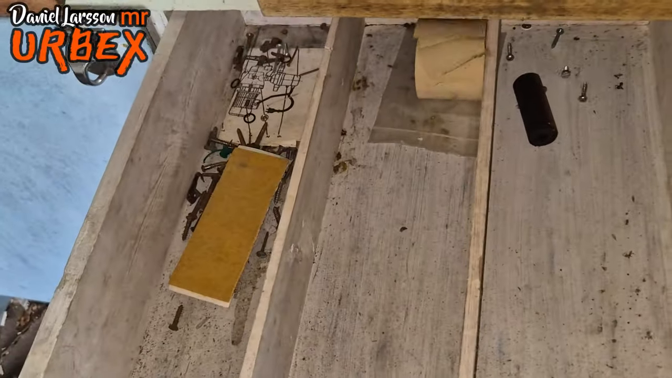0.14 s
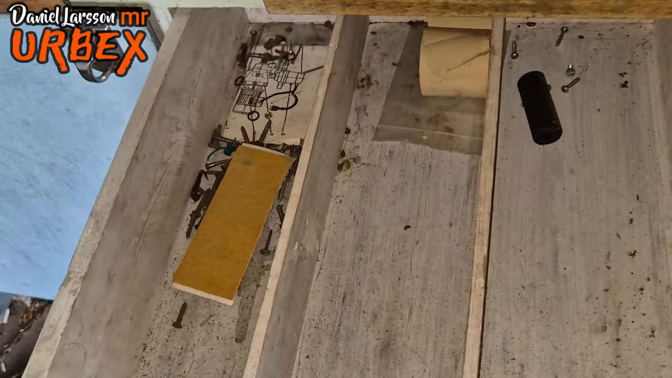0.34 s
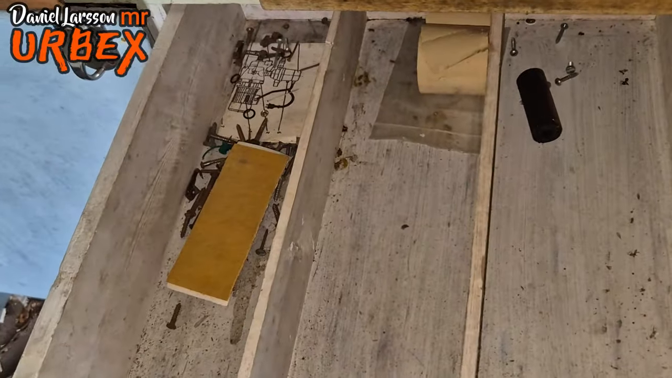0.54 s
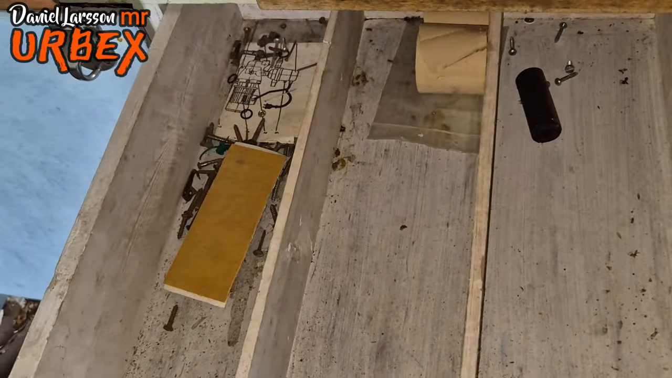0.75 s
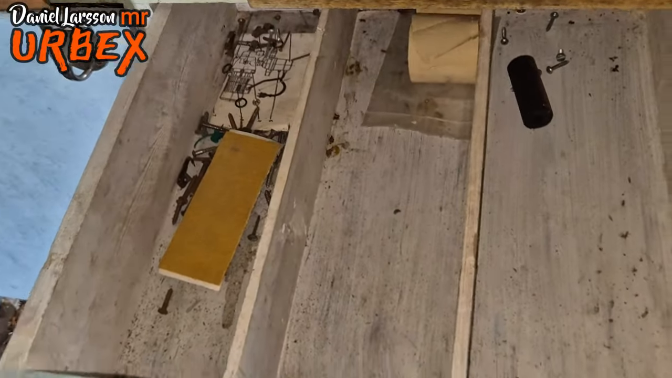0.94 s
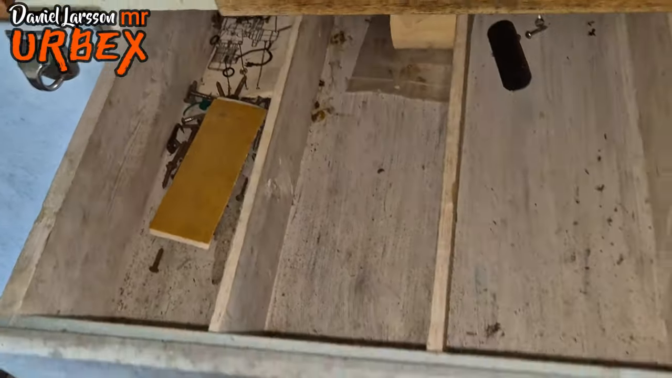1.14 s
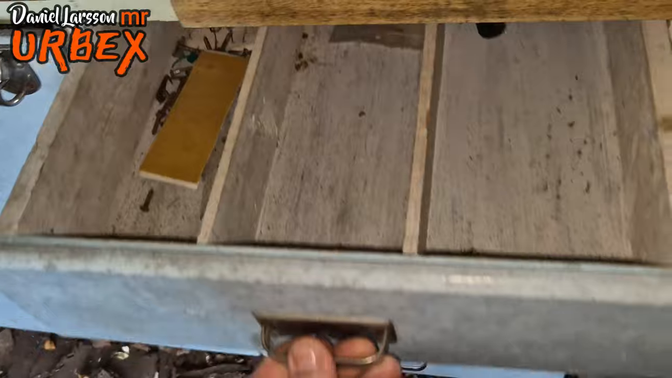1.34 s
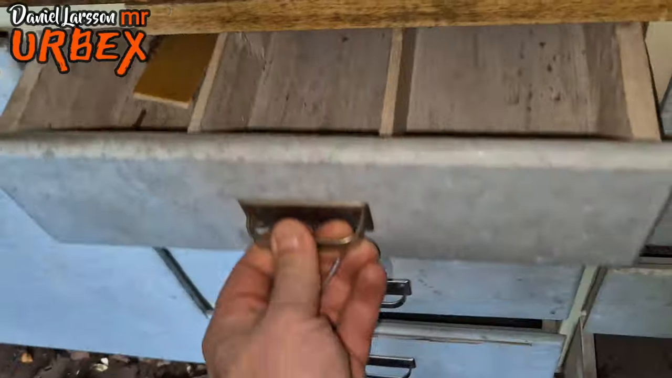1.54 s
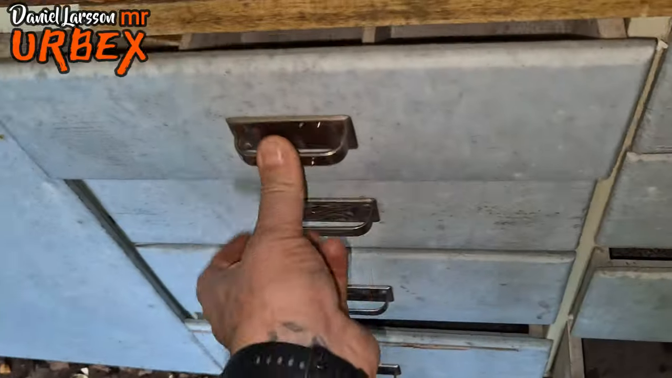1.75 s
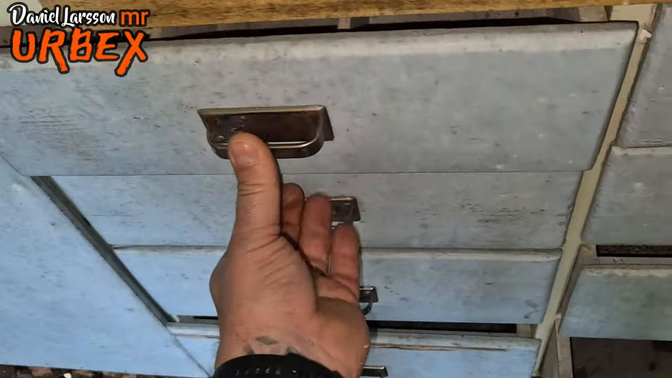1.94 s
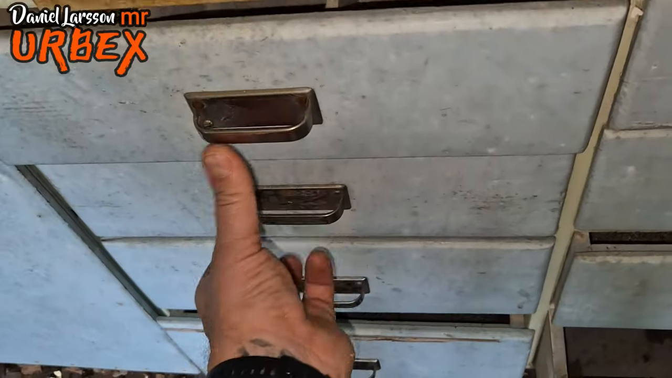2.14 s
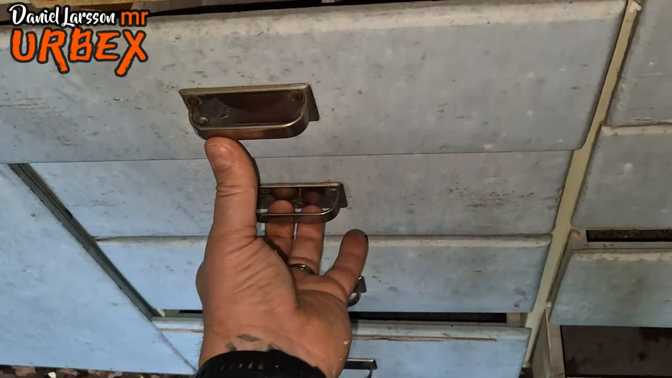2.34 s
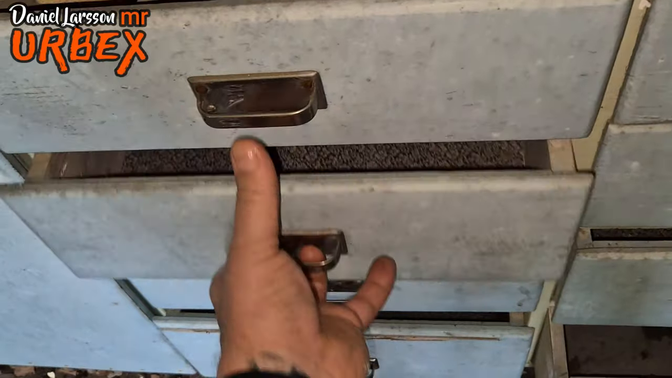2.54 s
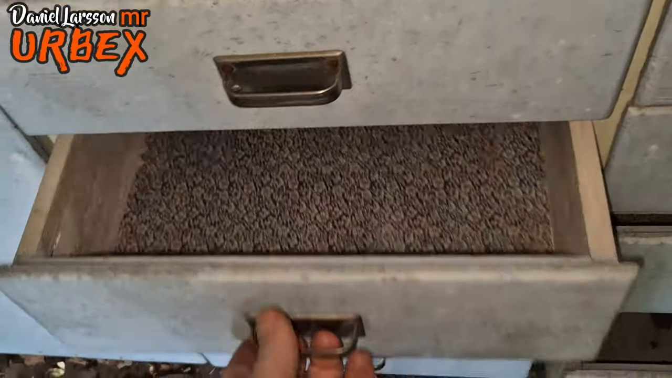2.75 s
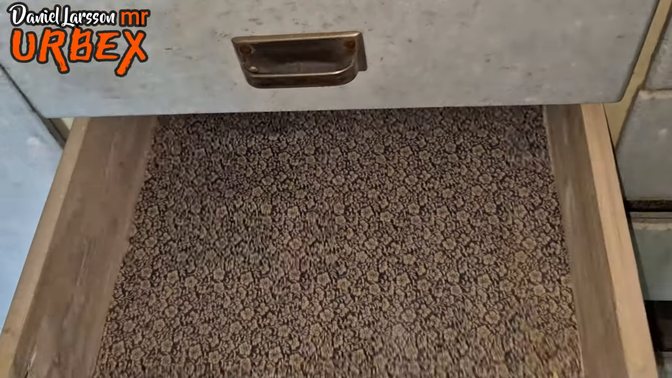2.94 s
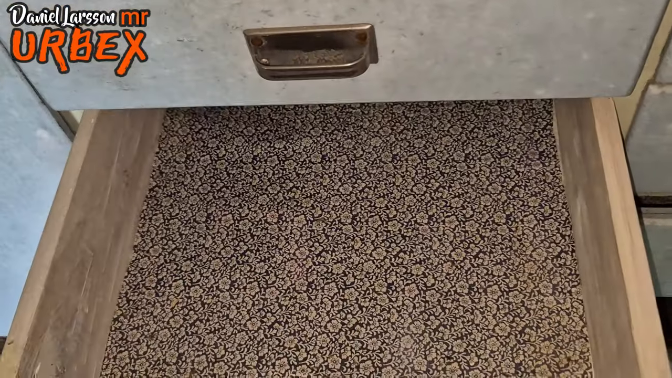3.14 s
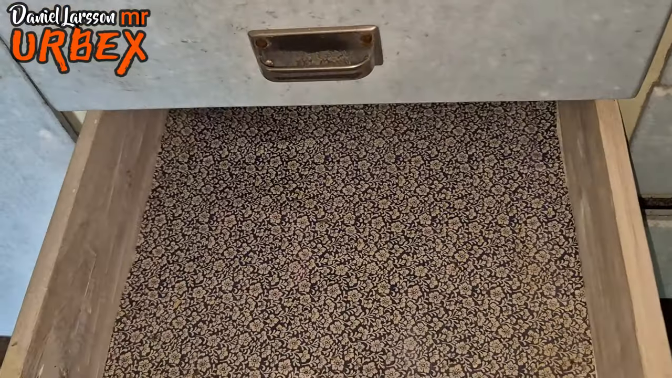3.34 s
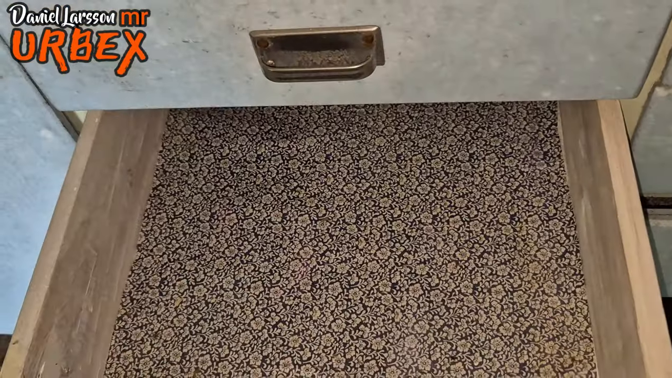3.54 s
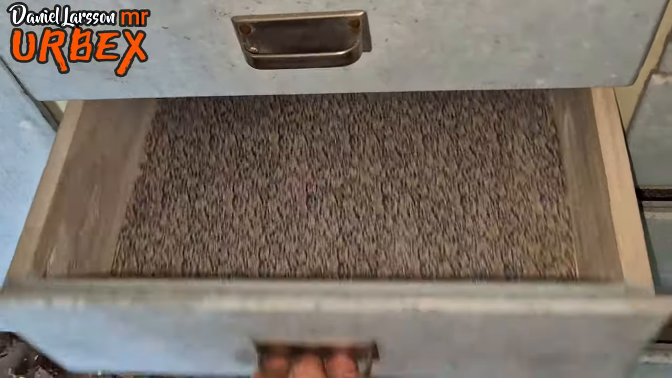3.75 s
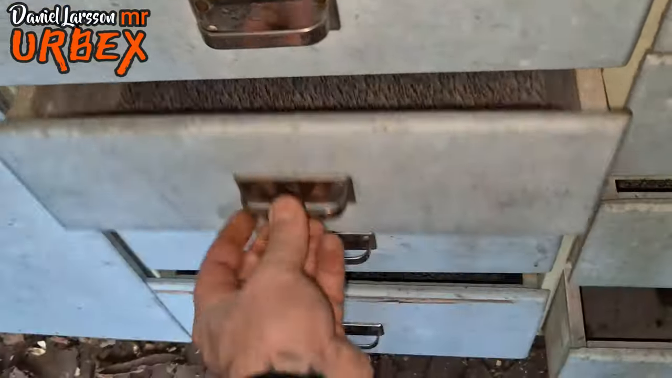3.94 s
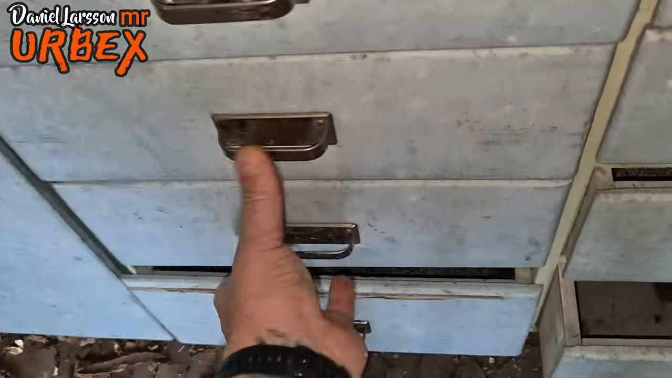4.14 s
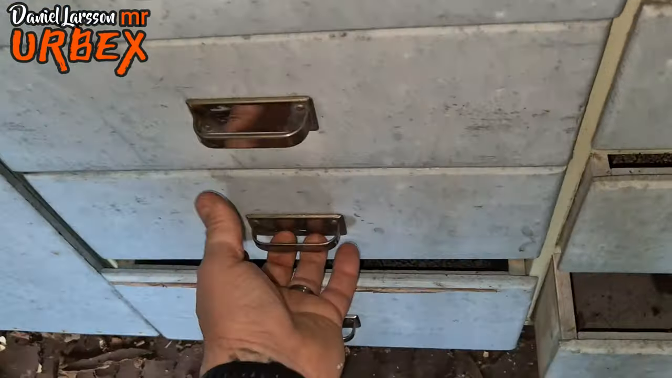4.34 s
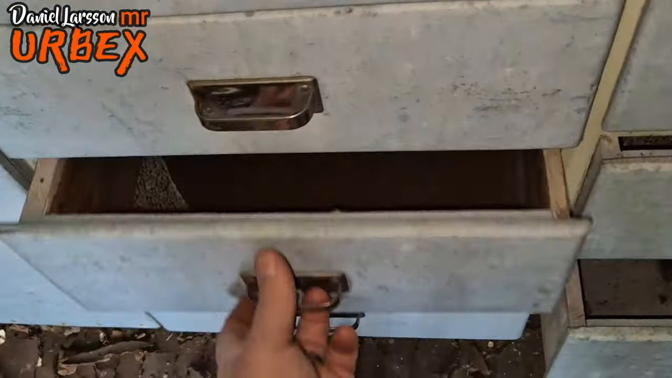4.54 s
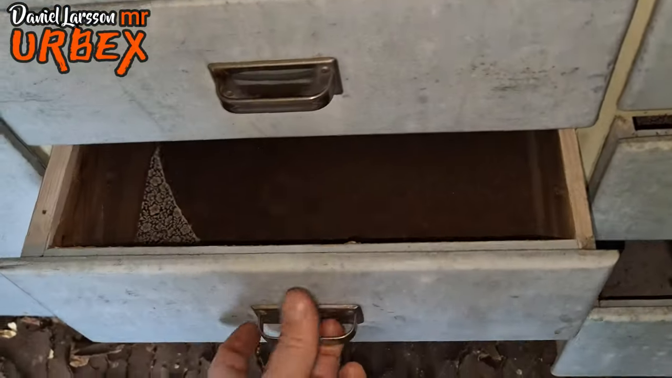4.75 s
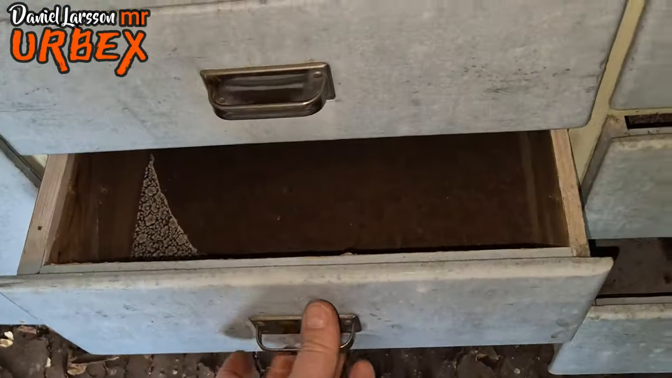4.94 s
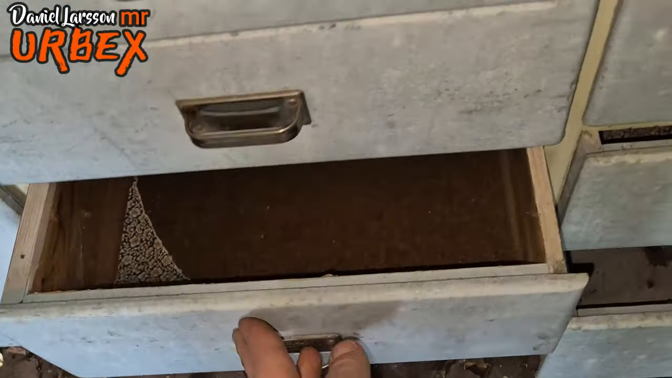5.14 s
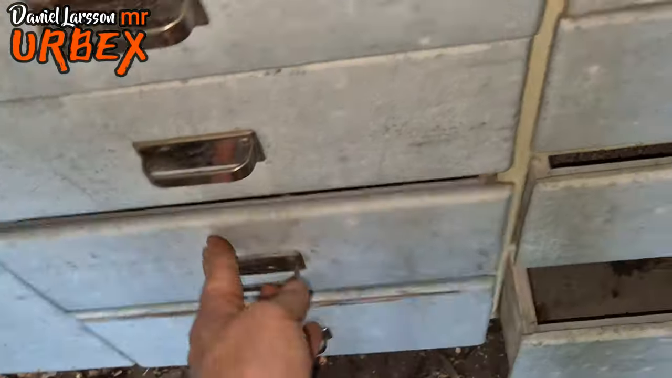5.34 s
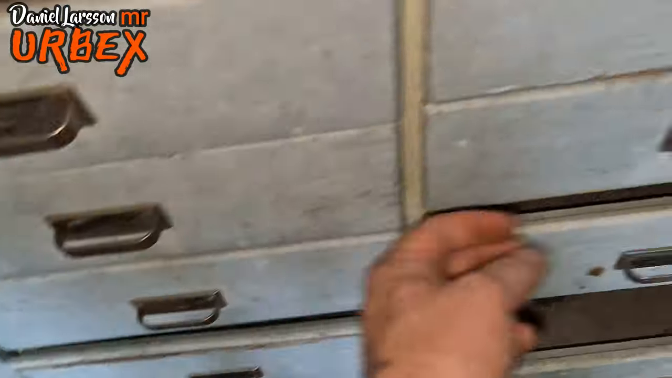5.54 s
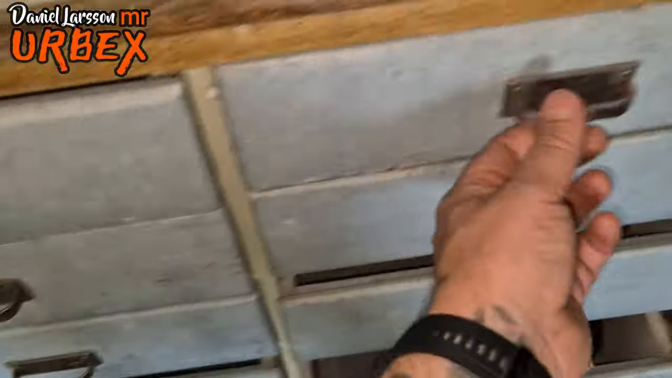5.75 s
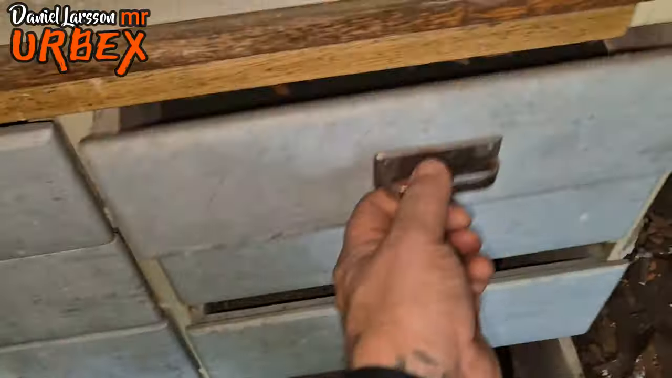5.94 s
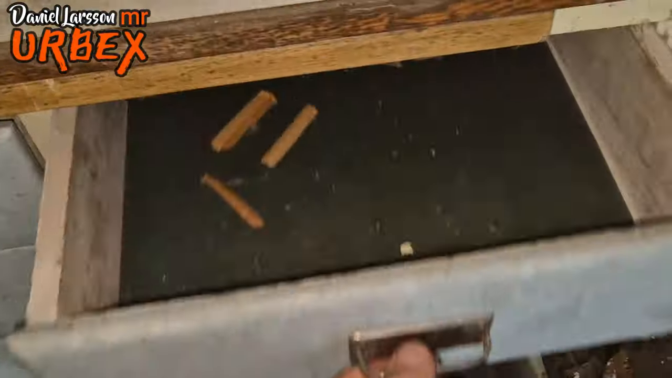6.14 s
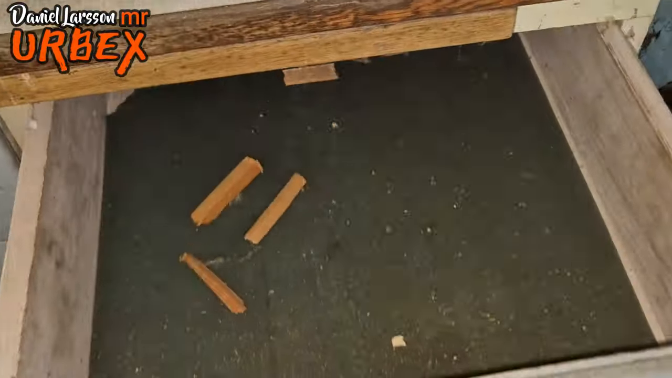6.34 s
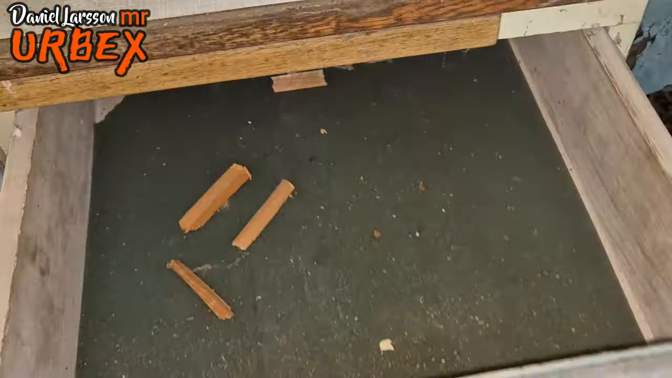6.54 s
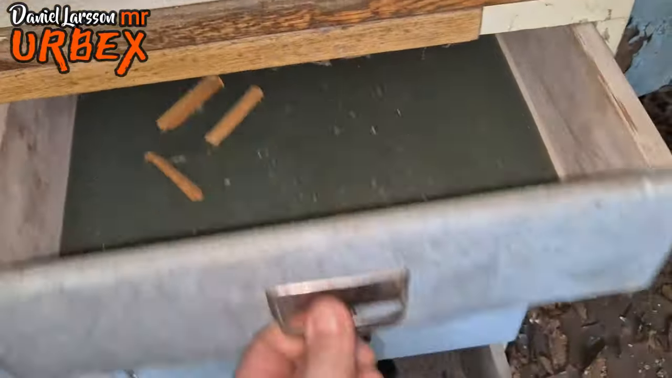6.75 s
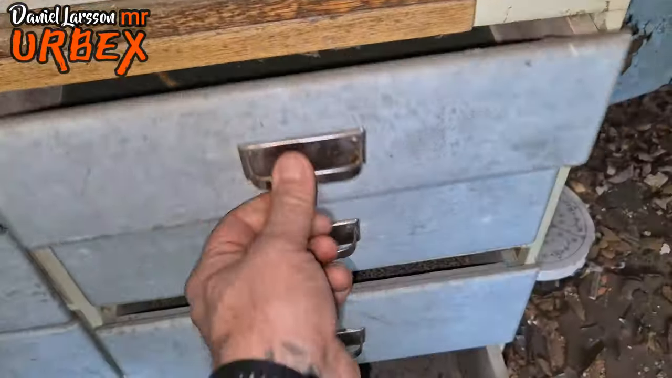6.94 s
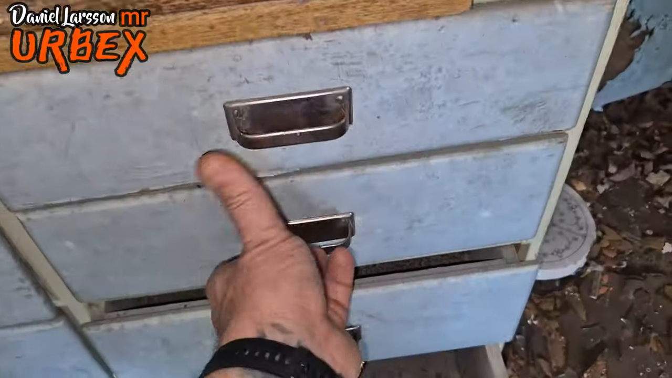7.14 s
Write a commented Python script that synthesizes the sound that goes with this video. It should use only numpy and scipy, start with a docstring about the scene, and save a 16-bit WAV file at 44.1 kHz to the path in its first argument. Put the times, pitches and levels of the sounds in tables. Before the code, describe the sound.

Old wooden drawers scrape and rumble open and shut in gritty runners, with hollow knocks, short groans and clicking metal pulls in a bare room.

```python
"""In the kitchen of an empty house, old wooden cabinet drawers are pushed shut and pulled open, close by.
Wood slips on wood in many small jolts that ring the cabinet; grit hisses as dust in the runners.
Drawers groan as wavering tones and knock at their stops, ringing the cabinet modes.
Fingers click the metal pulls, a crack of noise with a metal ring; fine ticks are short bands of noise.
Bare walls return a short echo, over the hiss of the still room and the microphone."""
import sys
import numpy as np
from scipy import signal
from scipy.fft import rfft, irfft
from scipy.io import wavfile
from scipy.ndimage import uniform_filter1d, minimum_filter1d

SR = 44100
rng = np.random.default_rng(int(sys.argv[2]) if len(sys.argv) > 2 else 0)


def file_out(sig):
    """Save sig as 16-bit WAV at sys.argv[1]."""
    # one column per channel
    cols = np.atleast_2d(sig).T
    # limit, then scale
    lim = np.clip(cols, -1, 1)
    pcm = np.round(lim * 32767).astype(np.int16)
    wavfile.write(sys.argv[1], SR, pcm)


N = 321048

# Colour of the still room and microphone hiss. Each row: frequency in Hz, relative level in dB per Hz.
AIR_COLOUR = [(30, -40), (130, -34), (400, -2.5), (1300, -16.5), (6500, -29), (9500, -13.5), (11500, -28),
              (16000, -35.5)]
# Level of that hiss, which sinks a little early on. Each row: time in seconds, level in dB.
AIR_LEVEL = [(1, -53.5), (3.2, -58)]
# Colour of the dust hiss. Each row: frequency in Hz, relative level in dB per Hz.
DUST_COLOUR = [(1500, -14.5), (2700, -6.5), (5900, -6), (8500, -1), (11300, -13.5), (13300, -13.5),
               (16000, -21.5)]
# Runs of fast sliding. Each row: start in seconds, length in seconds, share of the length at which
# speed peaks, dust hiss in dB and scrape of the sides in dB, both at top speed.
RUNS = [(-.04, 0.43, 0.074, -45, -36), (0.837, 0.31, 0.46, -37.5, -39), (1.048, 1, 0.062, -34, -35),
        (1.41, 1, 0.07, -38, -35), (1.793, 0.28, 0.16, -47.5, -27.5), (2.302, 0.96, 0.42, -45, -38),
        (2.564, 0.55, 0.56, -30.5, -30), (3.506, 0.4, 0.57, -33, -34.5), (3.798, 0.4, 0.2, -36.5, -29.5),
        (4.378, 0.87, 0.14, -47.5, -40), (4.572, 0.14, 0.63, -37.5, -39), (4.749, 0.18, 0.069, -40, -43),
        (5.162, 0.42, 0.25, -42.5, -40), (5.451, 0.12, 0.52, -49.5, -40.5), (5.66, 0.15, 0.1, -48.5, -35),
        (5.688, 0.87, 0.47, -45.5, -37), (5.99, 0.53, 0.41, -37.5, -61), (6.505, 0.75, 0.37, -40, -37)]
# Shoves of the hand. Each row: start in seconds, length in seconds, jolts at the start in dB, jolts at
# the end in dB, weight on the frame at the start in dB re jolts, small panels over large in dB per octave,
# dying away of the panels in dB per second.
SHOVES = [(-.02, 0.11, -26, -29.5, -13, 1, 57), (0.773, 0.33, -45.5, -17.5, -5.5, -2.5, 300),
          (1.086, 0.25, -27, -21, -11.5, -0.5, 300), (1.404, 0.23, -25.5, -27, -1, -4.5, 300),
          (1.652, 0.22, -21, -29.5, -2.5, -4, 89), (2.238, 0.24, -36, -43.5, 7, -12.5, 112),
          (2.493, 0.49, -23.5, -24, 1.5, -2.3, 185), (3.546, 0.33, -24.5, -19.5, 0.5, -0.4, 84),
          (4.398, 0.063, -26.5, -25, 7.5, -7, 248), (4.512, 0.09, -18, -27, -1, -1.5, 77),
          (4.892, 0.027, -8, -19, -11.5, -9, 224), (5.125, 0.32, -38.5, -33, -1.5, -6.5, 101),
          (5.816, 0.13, -54, -32.5, 6.5, -1, 230), (5.962, 0.32, -23, -28, -7, -2.5, 69),
          (6.495, 0.47, -27, -27, 0.5, -9, 91), (6.938, 0.052, -49, -21.5, 0, 1.5, 147)]
# Faint stirring between strokes. One row: panels, frame, dust and sides, each in dB.
REST_DB = [-60.5, -60, -68.5, -70.5]
# Modes of the heavy frame when rubbed. Each row: frequency in Hz, level in dB, t60 in seconds.
FRAME = [(64.6, -15, 0.13), (92.4, 7.5, 0.075), (131.7, -0.5, 0.2)]
# Modes of the panels when rubbed. Each row: frequency in Hz, level in dB, t60 in seconds.
PANELS = [(170.5, -8.5, 0.15), (218.4, -0.5, 0.17), (258.4, -3.5, 0.13), (300, -1, 0.096),
          (352, -0.5, 0.12), (411, 6, 0.06), (484.5, -1, 0.14), (546, 0, 0.053)]
# Modes of the sides, the smaller boards, when rubbed. Each row: frequency in Hz, level in dB, t60 in seconds.
SIDES = [(635, 1.5, 0.012), (756, 4, 0.034), (1034, 2, 0.025), (1161, -3, 0.032), (1405, -1, 0.021),
         (1670, -7, 0.024), (1810, -3.5, 0.012), (2393, 0, 0.0094)]
# Clicks of nails and metal pulls. Each row: start in seconds, peak in dB, brightness in dB per octave,
# t60 of the crack in seconds.
CLICKS = [(.011, -24, 0, 0.12), (0.1002, -30, 5, 0.046), (0.325, -26.5, -2, 0.086),
          (0.484, -29.5, -5.5, 0.034), (2.0947, -13.5, 1, 0.042), (2.189, -23, 1, 0.043),
          (2.2, -16.5, 0.5, 0.026), (2.361, -27, 8.5, 0.035), (2.5168, -17, -1, 0.032),
          (4.447, -22, -4, 0.042), (4.967, -23, -3.5, 0.038), (5.508, -24, -5, 0.027),
          (5.6643, -26, -5, .04), (5.687, -19.5, -5, 0.054), (5.802, -26, -7, 0.03),
          (5.879, -23, -4, 0.054), (5.976, -18, -14, .04), (6.5063, -26, -0.5, 0.046),
          (7.1419, -12.5, 1.5, 0.1), (7.171, -25, -8, 0.094)]
# Modes of a metal pull that rings freely. Each row: frequency in Hz, level in dB, t60 in seconds.
PULL = [(1237, 11.5, 0.19), (1620, 9.5, 0.078), (2325, 7, 0.13), (2750, 0, 0.18), (3420, 3.5, 0.065),
        (5580, -9, 0.34)]
# Knocks on the wood. Each row: start in seconds, peak in dB, frequency in Hz near which the struck part rings.
KNOCKS = [(0.043, -21, 726), (0.07, -15, 316), (0.099, -10, 444), (0.183, -12, 517), (0.289, -20, 468),
          (0.813, -27.5, 114), (1.443, -18, 205), (1.811, -24, 905), (1.824, -21, 1420), (1.868, -16, 1160),
          (2.034, -21.5, 1680), (2.273, -21.5, 122), (2.527, -10, 174), (3.561, -2.5, 247),
          (4.526, -9.5, 161), (4.913, -12, 238), (5.974, -9.5, 197), (6.537, -14.5, 107.6),
          (6.996, -19, 256), (7.056, -16, 146)]
# Faint ticks of fingernails and loose bits. Each row: start in seconds, peak in dB, centre in Hz.
TICKS = [(.172, -31, 4900), (1.904, -26.5, 8300), (2.032, -33, 3960), (2.415, -34, 6000),
         (4.2025, -32, 2870), (4.249, -35, 7450), (4.3366, -40, 5540), (4.389, -35.5, 5960),
         (4.735, -34, 7000), (5.785, -34, 5250), (5.907, -36, 8000)]
# Groans, where the slipping locks onto one panel. Each row: start in seconds, length in seconds,
# pitch in Hz, peak in dB.
GROANS = [(1.079, 0.36, 213.2, -20), (1.593, 0.11, 241, -16), (2.58, 0.088, 204.7, -18),
          (2.748, 0.096, 225.8, -17), (2.978, 0.11, 412, -25), (3.756, 0.12, 253, -18.5),
          (4.542, 0.14, 208, -19), (5.386, 0.15, 91.3, -21), (6.11, 0.23, 513, -26),
          (6.531, 0.15, 96.3, -14)]

JOLTS_PER_S, GRITS_PER_S = 350, 3300
SPEED_POWER = 1.91  # rubbing noise grows as speed to this power
LINED_FROM_S, LINING_DB = 2.3, 4.5  # the later drawers run on paper lining, which hisses brighter
RISE_S, FRAME_EASE_DB_PER_S = 0.023, 22  # the frame takes most weight as the drawer breaks loose
FRAME_SETTLE = 0.58  # the heavy frame dies away at this share of the panels' rate
LOOSE_T60 = 0.095  # crack t60 (s) of a pull that rings freely
CONTROL_S = 0.001  # step of the control rows
LIMIT, EDGE_HZ = 0.36, 15900  # peak amplitude the limiter aims at, top of the band


def gain_of(db):
    """Decibels to gain."""
    return 10 ** (np.asarray(db) / 20)


def evened(x):
    """Scales to rms 1."""
    return x / np.sqrt(np.mean(x ** 2) + 1e-20)


def peaked(x):
    """Scales to peak 1."""
    return x / abs(x).max()


def add(mix, s, sound):
    """Mixes a sound in at time s."""
    part = mix[round(s * SR):][:len(sound)]
    part += sound[:len(part)]


def coloured(x, points):
    """Shapes a signal by a spectrum of (Hz, dB) points, joined on a log frequency scale."""
    f, db = np.transpose(points)
    hz = np.fft.rfftfreq(len(x), 1 / SR)
    shape_db = np.interp(np.log(hz + 1), np.log(f + 1), db)
    return irfft(rfft(x) * gain_of(shape_db), len(x))


def softened(x, s):
    """A blow lasts s seconds, which takes off its treble."""
    push = np.hanning(round(s * SR) + 2)
    return signal.oaconvolve(x, push / push.sum())[:len(x)]


def ring(hz, db, t60, count=9000):
    """One dying mode."""
    t = np.arange(count) / SR
    return gain_of(db - 60 * t / t60) * np.sin(2 * np.pi * hz * t)


def grains(per_s, spread_db):
    """Sparse impulses of random sign, a few of them large."""
    place, size, sign = rng.random((round(per_s * N / SR), 3)).T
    size_db = spread_db * np.minimum(-np.log(1 - size), 4)
    out = np.zeros(N)
    out[(place * N).astype(int)] = gain_of(size_db) * np.sign(sign - 0.5)
    return evened(out)


def wander(per_s):
    """Random drift of rms 1 through per_s new values a second."""
    steps = np.arange(0, N + SR, SR / per_s)
    return evened(np.interp(np.arange(N), steps, rng.standard_normal(len(steps))))


def stretched(rows):
    """Reads control rows at every sample."""
    place = np.arange(N) / SR / CONTROL_S
    return [np.interp(place, np.arange(len(row)), row) for row in rows]


def still_air():
    """Still room and microphone hiss: coloured noise at a slowly sinking level."""
    s, db = np.transpose(AIR_LEVEL)
    level_db = np.interp(np.arange(N) / SR, s, db)
    return gain_of(level_db) * evened(coloured(rng.standard_normal(N), AIR_COLOUR))


def running():
    """Speed arches over each run and sets the rubbing noise: dust dB, scrape dB."""
    t = np.arange(0, N / SR, CONTROL_S)
    power = gain_of(np.array(REST_DB[2:])[:, None]) ** 2 + 0 * t
    for s, length, top, hiss_db, scrape_db in RUNS:
        u = np.clip((t - s) / length, 0, 1)
        bend = np.log(0.5) / np.log(np.clip(top, 0.05, 0.95))  # puts the arch's crown at the top-speed share
        speed = abs(np.sin(np.pi * u ** bend))
        power = power + (gain_of([[hiss_db], [scrape_db]]) * speed ** SPEED_POWER) ** 2
    return stretched(10 * np.log10(power))


def dust():
    """Fine grit between the boards: hiss with grains in it, its colour shifting in patches."""
    rub = rng.standard_normal(N) + 0.5 * grains(GRITS_PER_S, spread_db=4.0)
    hz, t, spectrum = signal.stft(evened(coloured(rub, DUST_COLOUR)), SR, nperseg=256)
    patches = rng.standard_normal(spectrum.shape[::-1]).T
    patches = uniform_filter1d(patches, size=10, axis=0)  # smooth over frequency
    patches = evened(uniform_filter1d(patches, size=14, axis=1))  # and over time
    lining_db = LINING_DB * np.outer(hz > 10500, t > LINED_FROM_S)
    shifting = spectrum * gain_of(1.82 * patches + lining_db)
    hiss = signal.istft(shifting, SR, nperseg=256)[1][:N]
    dust_db, _ = running()
    return hiss * gain_of(dust_db + 1.1 * wander(60.0))


def shoving():
    """Each shove rises, leans from its start to its end force and dies away: panel dB, frame dB, lean."""
    t = np.arange(0, N / SR, CONTROL_S)
    panels = gain_of(REST_DB[0]) ** 2 + 0 * t
    frame = gain_of(REST_DB[1]) ** 2 + 0 * t
    lean = 0 * t
    for s, length, first_db, last_db, frame_db, lean_db, fall_db in SHOVES:
        u = np.clip((t - s) / length, 0, 1)
        after = np.maximum(t - s - length, 0)
        onset = np.clip((t - s) / RISE_S, 0, 1)
        jolt_db = first_db + (last_db - first_db) * u
        power = (onset * gain_of(jolt_db - fall_db * after)) ** 2
        panels = panels + power
        lean = lean + lean_db * power  # the stronger shove decides the lean
        eased_db = jolt_db + frame_db - FRAME_EASE_DB_PER_S * length * u
        frame = frame + (onset * gain_of(eased_db - FRAME_SETTLE * fall_db * after)) ** 2
    return stretched([10 * np.log10(panels), 10 * np.log10(frame), lean / panels])


def rubbed(modes, level_db, lean_db, shared, drift_db):
    """Jolts drive each mode; as the contact point moves, shares drift and lean to high or low modes."""
    centre = np.sqrt(modes[0][0] * modes[-1][0])
    shares = [gain_of(lean_db * np.log2(hz / centre)) for hz, db, t60 in modes]
    energy = sum(share ** 2 * np.sum(ring(*mode) ** 2) for share, mode in zip(shares, modes))
    scale = np.sqrt(energy)
    out = np.zeros(N)
    for k, (share, mode) in enumerate(zip(shares, modes)):
        jolts = evened(shared + 0.9 * grains(JOLTS_PER_S, spread_db=3.0))
        jolts = jolts * gain_of(level_db + drift_db * wander(9.0))
        rung = signal.oaconvolve(jolts * share / scale, ring(*mode))[:N]
        out += (-1) ** k * rung  # neighbours swing opposite ways
    return out


def sliding():
    """Stick and slip in the runners ring frame, panels and sides."""
    jolt_db, frame_db, lean_db = shoving()
    dust_db, scrape_db = running()
    shared = grains(JOLTS_PER_S, spread_db=2.0)
    frame = rubbed(FRAME, frame_db, 0, shared, drift_db=3.0)
    panels = rubbed(PANELS, jolt_db, lean_db, shared, drift_db=5.0)
    side_lean_db = 0.22 * (scrape_db - dust_db)  # a dry scrape with little dust rings the smaller boards
    sides = rubbed(SIDES, scrape_db + 2.0 * wander(35.0), side_lean_db, shared, drift_db=3.0)
    return softened(frame + panels, 0.0015) + softened(sides, 0.00019)


def room_echo(x):
    """Bare walls: sparse taps of random sign, dying away and dulled."""
    t = np.arange(SR // 2) / SR
    present = (rng.random(len(t)) < 2000 / SR) * (t > 0.008)  # 2000 taps a second after the first 8 ms
    taps = rng.choice([-1., 1.], len(t)) * present
    tail = coloured(taps * gain_of(-60 * t / 0.31), [(100, -17.5), (2000, 0.0), (12000, -21.0)])
    return signal.oaconvolve(x, tail / np.linalg.norm(tail))[:N]


def clicks():
    """A short crack with a faint rattle after it; the looser the pull, the longer the crack and its ring."""
    out, t = np.zeros(N), np.arange(9000) / SR
    for s, db, tilt_db, crack_t60 in CLICKS:
        colour = [(300, 4.5 - 2 * tilt_db), (900, -2 * tilt_db), (3600, 0),
                  (8500, tilt_db - 0.5), (11000, tilt_db - 10.0), (16000, tilt_db - 21.0)]
        snap = gain_of(-60 * t / 0.018)
        body = 0.94 * gain_of(-60 * t / crack_t60)
        rattle = gain_of(-18 - 60 * t / 0.25)
        noise = evened(coloured(rng.standard_normal(len(t)), colour))
        crack = noise * np.minimum(t / 0.0009, 1) * (snap + body + rattle)
        spot_db = 2.5 * rng.standard_normal(len(PULL))  # each click favours other modes
        metal = sum(ring(hz, mode_db + e + tilt_db * np.log2(hz / 3600), t60 * crack_t60 / LOOSE_T60)
                    for (hz, mode_db, t60), e in zip(PULL, spot_db))
        add(out, s, gain_of(db) * peaked(peaked(crack) + 0.41 * peaked(metal)))
    return out


def knocks():
    """A soft blow rings the cabinet modes near the struck part most; the hand damps them."""
    out = np.zeros(N)
    modes = [*FRAME, *PANELS, *SIDES]
    for s, db, hz in KNOCKS:
        cabinet = 0
        for k, (mode_hz, mode_db, t60) in enumerate(modes):
            far_db = np.minimum(10 * np.log2(mode_hz / hz) ** 2, 32.0)
            cabinet = cabinet + (-1) ** k * ring(mode_hz, mode_db - far_db, 0.5 * t60)  # damped to half the t60
        struck_part = ring(hz, 1.4, 24.0 / hz)
        sound = softened(peaked(cabinet) + struck_part, 0.39 / hz)  # small parts are struck more sharply
        add(out, s, gain_of(db) * peaked(sound))
    return out


def ticks():
    """A tiny burst of noise in a broad band, quick to rise and to die."""
    out, t = np.zeros(N), np.arange(1500) / SR
    for s, db, hz in TICKS:
        band = [(0.5 * hz, -11.0), (hz, 0.0), (2 * hz, -11.0)]  # fainter an octave away
        noise = coloured(rng.standard_normal(len(t)), band)
        sound = noise * np.minimum(t / 0.00061, 1) * gain_of(-60 * t / 0.053)
        add(out, s, gain_of(db) * peaked(sound))
    return out


def groans():
    """Slipping locked onto one panel: a wavering tone that swells quickly and fades."""
    out, waver = np.zeros(N), wander(30.0)
    for s, length, hz, db in GROANS:
        u = np.arange(0, 1, 1 / (length * SR))
        pitch = hz * (1 + 0.024 * waver[round(s * SR):][:len(u)])
        turns = np.cumsum(pitch) / SR + rng.random()
        swell = np.sin(np.pi * u ** 0.7)
        add(out, s, gain_of(db) * swell * np.sin(2 * np.pi * turns))
    return out


def scene():
    """Cabinet sounds, their echo and the still air."""
    cabinet = dust() + sliding() + clicks() + knocks() + ticks() + groans()
    return (cabinet + gain_of(-18.5) * room_echo(cabinet) + still_air())[None]


def record(dry):
    """The microphone cuts the deep bass, a quick limiter holds the peaks; then the band limit."""
    thin = signal.sosfilt(signal.butter(4, 46, "high", fs=SR, output="sos"), dry)
    gain = np.minimum(1, LIMIT / (abs(thin) + 1e-9))
    smooth_gain = uniform_filter1d(minimum_filter1d(gain, size=401), size=201)  # ducks just ahead of a peak
    band = signal.firwin(511, EDGE_HZ, window=("kaiser", 9), fs=SR)
    return signal.oaconvolve(thin * smooth_gain, band[None], "same")


dry = scene()
out = record(dry)
file_out(out)
```